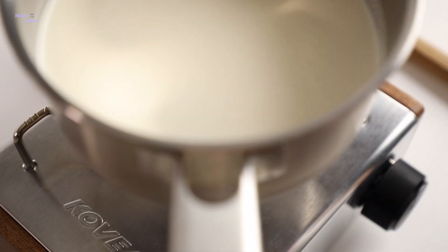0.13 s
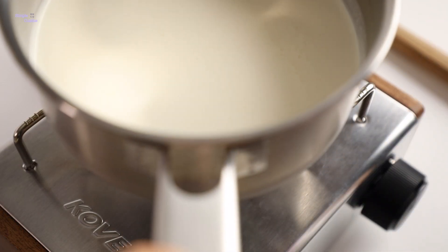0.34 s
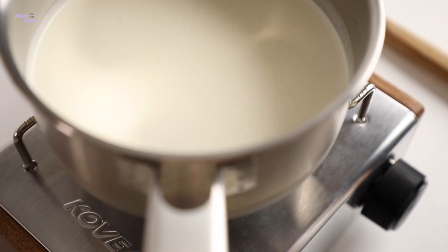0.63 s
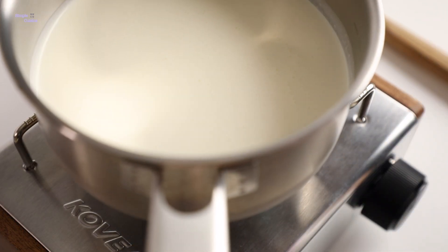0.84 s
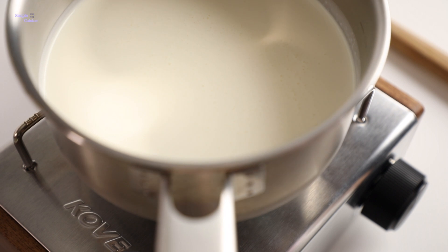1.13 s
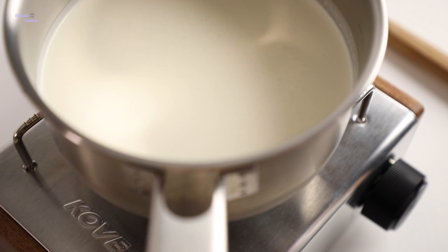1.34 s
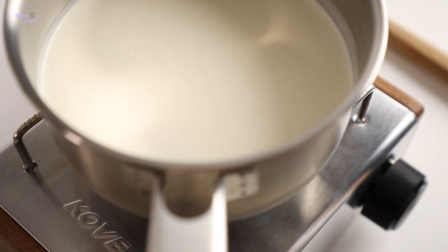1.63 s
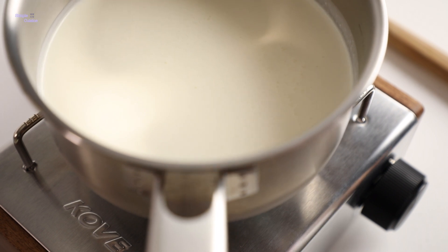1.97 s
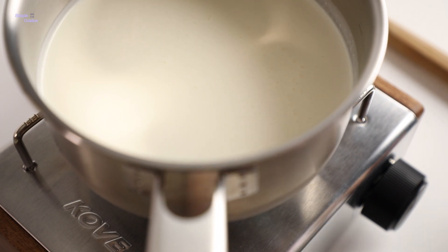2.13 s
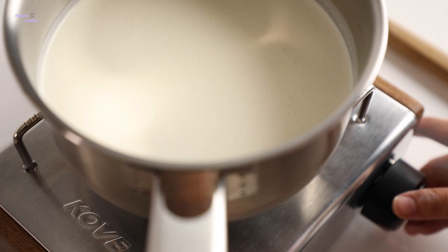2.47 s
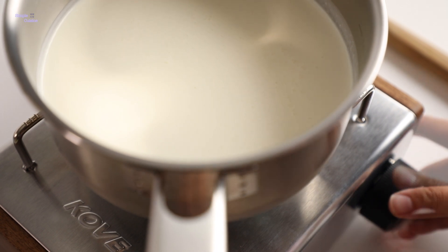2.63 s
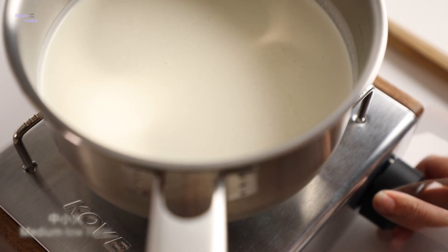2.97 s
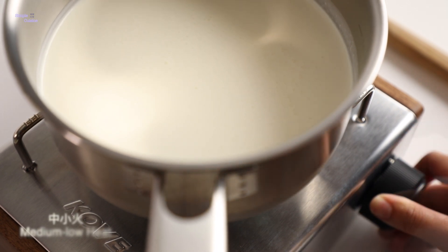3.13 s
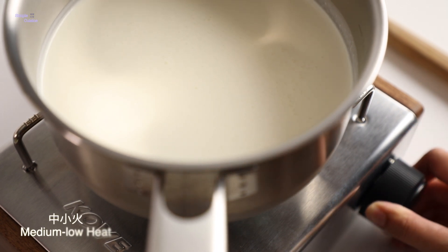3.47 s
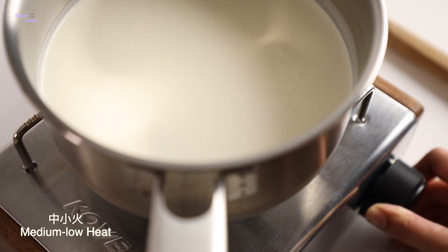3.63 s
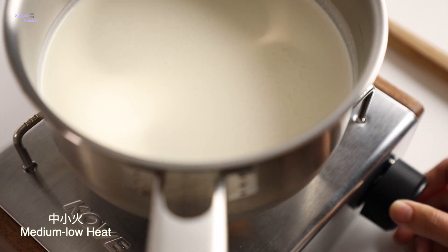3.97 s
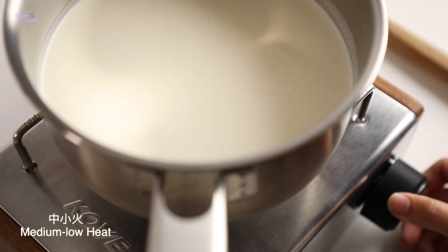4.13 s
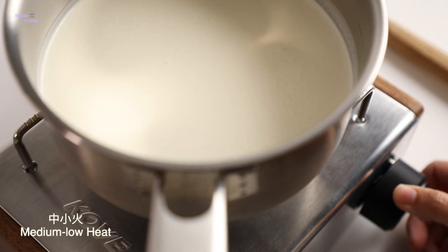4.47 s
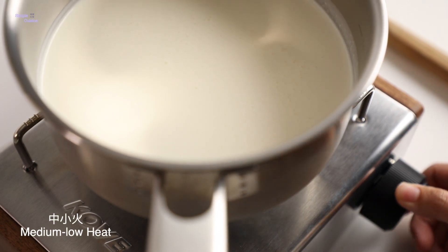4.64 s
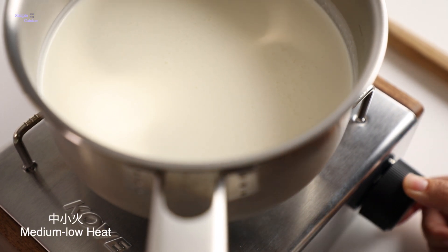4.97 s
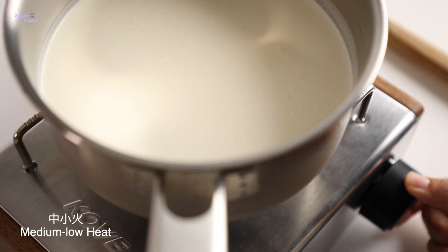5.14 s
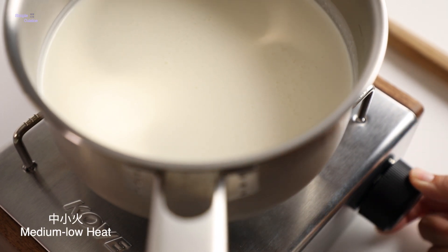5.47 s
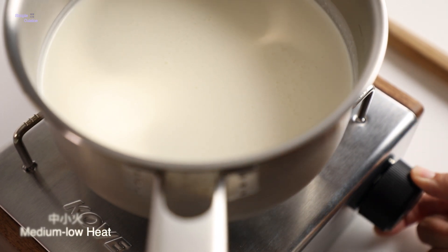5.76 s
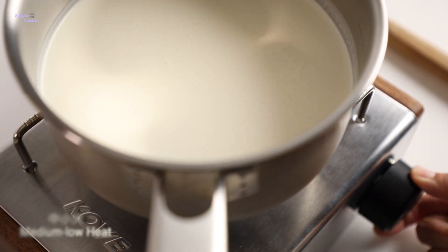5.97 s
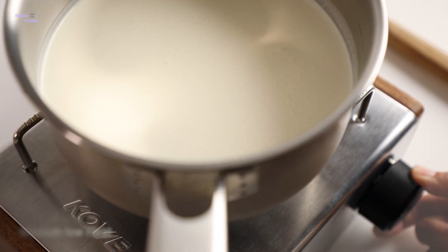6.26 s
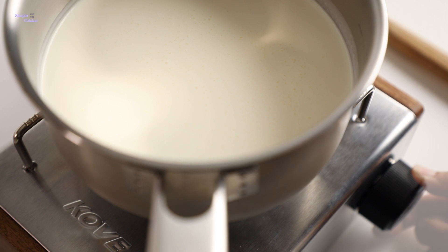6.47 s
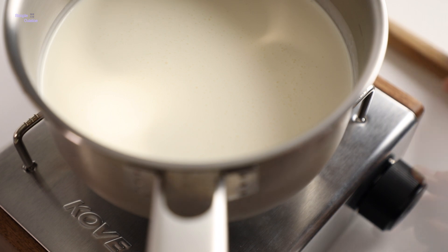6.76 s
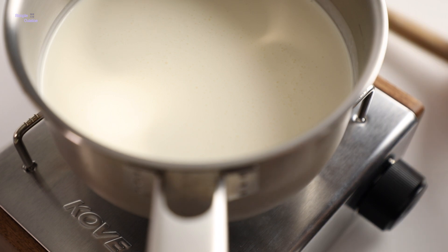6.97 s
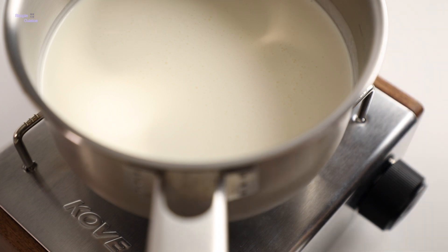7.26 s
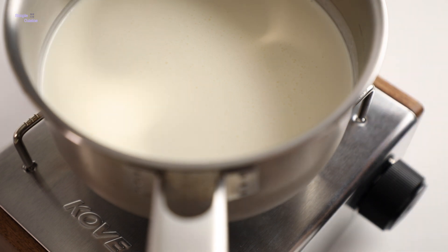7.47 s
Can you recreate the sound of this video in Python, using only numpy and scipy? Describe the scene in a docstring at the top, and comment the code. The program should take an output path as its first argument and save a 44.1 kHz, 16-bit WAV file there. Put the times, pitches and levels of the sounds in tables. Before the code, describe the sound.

A steel pan of milk clatters to rest on a portable stove, gas hisses, the igniter snaps loudly, and a soft flame burns before being turned down.

```python
"""A portable gas stove in a small kitchen, heard by one close microphone: gas hisses through the mixing
tube as a hand turns the knob, the piezo igniter snaps and the flame catches. Hiss and flame are shaped noise.
Before that a steel pan of milk rocks to rest on the support; its blows are noise bursts and ringing modes.
The knob springs back with a second click, then the flame is turned down to a soft hiss.
Taps and finger rubs are bands of noise; still kitchen air and a faint, distant hum lie underneath."""
import sys
import numpy as np
from scipy import signal
from scipy.fft import rfft, irfft, next_fast_len
from scipy.io import wavfile
from scipy.ndimage import map_coordinates

SR = 44100
rng = np.random.default_rng(int(sys.argv[2]) if len(sys.argv) > 2 else 0)


def file_out(sig):
    """Save sig as 16-bit WAV at sys.argv[1]."""
    # one column per channel
    cols = np.atleast_2d(sig).T
    # limit, then scale
    lim = np.clip(cols, -1, 1)
    pcm = np.round(lim * 32767).astype(np.int16)
    wavfile.write(sys.argv[1], SR, pcm)


N = 335368
T = np.arange(N) / SR  # time in s

# Kitchen air: frequency_hz, relative level_db
AIR_COLOUR = [(20, -23.5), (60, 0), (95, -5), (160, -7), (270, -4.5), (480, -0.5), (750, -5.5),
              (1100, -10.5), (1500, -6), (2100, -14), (3200, -16.5), (8500, -21.5), (12000, -29),
              (16000, -38.5)]
# Hum of a distant appliance: pitch_hz, level_db before HUM_GAIN_DB
HUM_TONES = [(161.5, -78), (236.9, -82.5), (1529, -88), (2412, -88), (3160, -89), (5006, -94.5)]
# Hard kitchen walls: frequency_hz, t60_s
WALL_DECAY = [(100, 0.22), (500, 0.74), (1500, .39), (5000, 0.39), (8000, 0.31), (14000, 0.23)]
# Taps on pan, knob and stove: start_s, level_db, pitch_hz, width_octaves, hold_s
TAPS = [(0.61, -61.5, 3030, 0.55, 0.0036), (2.347, -54.5, 4950, 1.8, .0005),
        (2.362, -52.5, 4900, 2.55, 0.013), (2.748, -50, 1770, 1.5, 0.022), (2.99, -51, 730, 2.26, 0.026),
        (3.84, -34, 1740, 2.3, 0.0042), (4.526, -30.5, 1280, 1.7, 0.006), (6.985, -58, 2200, 3, 0.00045),
        (7.002, -50.5, 1400, 5.8, 0.0018)]
# Fingers sliding on handle, knob and casing: start_s, length_s, level_db, centre_hz, width_octaves
FINGER_RUBS = [(1.764, 0.045, -70, 4800, .2), (1.826, 0.12, -65, 670, 0.52), (2.357, 0.26, -63, 6500, 1.15),
               (2.461, 0.098, -61.5, 5400, 1.06), (2.886, 0.083, -66, 1600, 2.3),
               (7.002, 0.062, -57, 1550, 4.8)]
# Pan rocking on its support: start_s, clatter_db, chatter_s, knock_db (dull), clank_db
PAN_BLOWS = [(0.8935, -15.5, 0.014, -15, -19.5), (1.027, -21.5, 0.015, -21, -16),
             (1.1385, -20.5, 0.024, -24.5, -16.5), (1.2342, -22, 0.0082, -25.5, -22.5),
             (1.403, -53.5, 0.028, -43.5, -42), (1.599, -67.5, .002, -54.5, -65)]
# Low and high modes of pan and support, damped by the milk: pitch_hz, relative level_db, t60_s
PAN_LOW_MODES = [(71.4, -19, 0.28), (92.3, -22.5, 0.2), (117, -20.5, 0.32), (374, -11, 0.32),
                 (423.4, -2, 0.13), (502, 3, 0.079), (587, -2, 0.13)]
PAN_HIGH_MODES = [(987, -4, 0.18), (1019, 5, 0.084), (1107, -6.5, 0.079), (1180, -11, 0.19),
                  (1470, -9, 0.18), (1750, -20, 0.3), (1907, -14, 0.14), (2355, -11, 0.16),
                  (4457, -16, 0.091), (5006, -15.5, .13)]
# Dense sheet modes of the pan: frequency_hz, relative level_db
PAN_SHEET = [(200, -27.5), (400, -2), (750, -8), (1100, 0.5), (1500, 1.5), (2000, -5.5), (2600, -0.5),
             (3400, -5), (4700, -3.5), (7000, -4), (10000, -10), (15000, -15.5)]
# Igniter hammer, its reset, the knob's stop: start_s, clatter_db, chatter_s, knock_db (dull), clank_db
IGNITER_BLOWS = [(3.6804, -2, 0.0075, -11, -20), (4.5166, -21.5, 0.0036, -40, -35),
                 (4.528, -41, 0.0071, -29, -46.5)]
# Low and high modes of the stove casing: pitch_hz, relative level_db, t60_s
CASE_LOW_MODES = [(127, -27, 0.73), (280, -21, 0.22), (384, -2.5, .11), (512, 2.5, 0.073)]
CASE_HIGH_MODES = [(1019, 2.5, 0.24), (1067, -0.5, 0.21), (1453, 2, 0.096), (1824, 2, 0.11),
                   (2980, -1, 0.08), (3400, -1.5, 0.17), (3710, 0, 0.065), (3730, -2, 0.12),
                   (4110, -2, 0.068), (4570, 0, .14), (5930, -3, 0.098), (6210, 2, 0.064),
                   (6500, -0.5, 0.078), (7800, 3, 0.045), (7870, 2, 0.05)]
# Dense sheet modes of the casing: frequency_hz, relative level_db
CASE_SHEET = [(60, -33.5), (220, -22), (400, -3.5), (780, -9.5), (1100, 1.5), (1800, 1), (2400, 0.5),
              (3500, 1), (6000, 2), (8500, 0), (11000, -6.5), (15000, -12)]
# Gas flow, set by the knob: time_s, flow_db (as hiss, before JET_GAIN_DB)
FLOW_CURVE = [(2.85, -65), (3.05, -57.5), (3.19, -55), (3.8, -54), (4.29, -54), (4.66, -53.5), (5.5, -54.5),
              (6.1, -56), (6.62, -66.5), (7.6, -62.5)]
# Hiss of the nozzle: frequency_hz, relative level_db
JET_HISS = [(200, -42), (450, -10.5), (1000, -19.5), (2500, -15), (3800, -12), (4700, -4), (5500, -9),
            (7100, 2), (8700, -12.5), (10000, -14), (11000, -14.5), (12000, -24.5), (14500, -23.5),
            (16000, -32)]
# Resonances of the mixing tube: centre_hz, width_hz (6 dB down), relative level_db
TUBE_RESONANCES = [(476, 79, -0.5), (3166, 180, -3.5), (4603, 280, -6), (6620, 40, 4.5), (6940, 31, 12.5),
                   (7030, 52, 10), (7150, 81, 3), (7480, 83, 1.5), (7740, 200, -0.5), (9130, 770, -8.5)]
# Deep rumble of the fire: frequency_hz, relative level_db
RUMBLE_COLOUR = [(30, -26), (85, -9), (150, 2.5), (200, -3.5), (300, -10.5), (600, -31.5), (2000, -71)]
# Roar of the fire: frequency_hz, relative level_db
ROAR_COLOUR = [(40, -55), (100, -27.5), (200, -18), (280, -1), (370, -0.5), (470, -0.5), (540, -16.5),
               (620, -21), (800, -24), (1000, -41), (3000, -51.5)]
# Flame tips on the pan: frequency_hz, relative level_db
TIPS_COLOUR = [(600, -17), (1000, -8), (1200, 2.5), (1700, -1), (2100, -6), (3000, -20), (6000, -36.5)]

AIR_DB, HUM_GAIN_DB = -66.0, 2.5
CLICK_DB, CLICK_HOLD_S, CLICK_T60_S = -5.5, 0.0012, 0.016  # bright contact; level relative to the tap
CLICK_PITCH_RATIO = 1.94  # centre of the click over the tap's pitch
TAP_T60_S = 0.052
GRAIN_DB, GRAINS_PER_S = 2, 240  # skin sticks and slips as it slides
CRACK_DB = 2.5  # relative to the clatter
DB_PER_OCTAVE = 22  # a blow this much softer is an octave duller
THUMP_DB, THUMP_LAG_S, THUMP_HOLD_S, THUMP_T60_S = -24, 0.0027, 0.006, 0.048
VALVE_S, VALVE_RISE_S, JET_GAIN_DB = 2.78, 0.069, 2.5  # the valve opens
LIT_S, SPREAD_S = 3.72, 0.24  # the gas catches and the fire runs round the burner
ROAR_DB, USUAL_FLOW_DB = -54.5, -55  # warm burner at the usual flow, before BURNER_GAIN_DB
ROAR_PER_FLOW = 1.6  # dB of roar per dB of flow
SURGE_DB, SETTLE_S = 13, 1.6  # the fresh flame is louder and calms as the burner warms (time constant)
BURNER_GAIN_DB = -1.5
TOP_HZ = 15800  # edge of the final low-pass


def amp(db):
    """Decibels to gain."""
    return 10 ** (np.asarray(db) / 20)


def unit(x):
    """Scale to rms 1."""
    return x / np.sqrt(np.mean(x ** 2) + 1e-20)


def along(points, hz):
    """Values of a frequency table, joined on a log axis."""
    f, v = np.transpose(points)
    return np.interp(np.log(hz + 1), np.log(f + 1), v)


def wobble(rate):
    """A smooth random curve, rate knots a second."""
    knots = rng.standard_normal(int(N * rate / SR) + 4)
    return map_coordinates(knots, [T * rate])


def noise(gain, size=N):
    """Noise of rms 1 whose spectrum follows gain(Hz)."""
    m = next_fast_len(size)
    spectrum = rfft(rng.standard_normal(m)) * gain(np.fft.rfftfreq(m, 1 / SR))
    return unit(irfft(spectrum, m)[:size])


def coloured(points):
    """Noise of rms 1 with the colour of a level table."""
    return noise(lambda hz: amp(along(points, hz)))


def below(hz, edge_hz, order=4):
    """Gain of a low-pass slope; with the arguments swapped, of a high-pass one."""
    return 1 / np.sqrt(1 + (hz / edge_hz) ** (2 * order))


def band(centre_hz, octaves):
    """One second of noise in a band, equally strong in each octave of it."""
    low_hz = centre_hz / 2 ** (octaves / 2)
    high_hz = centre_hz * 2 ** (octaves / 2)

    def gain(hz):
        """Band edges on a slope of equal power per octave."""
        return below(hz, high_hz, order=9) * below(low_hz, hz + 1, order=9) / np.sqrt(hz + 1)

    return noise(gain, size=SR)


def burst(hold, t60):
    """Envelope of a contact: it holds for a moment, then dies away."""
    return amp(-60 * np.maximum(T[:SR] - hold, 0) / t60)


def add(track, s, sound):
    """Mix a sound in at time s."""
    part = track[round(s * SR):][:len(sound)]
    part += sound[:len(part)]


def ring(modes, rise, scatter_db, detune):
    """Decaying modes; the point of contact shifts their strength and pitch a little."""
    hz, db, t60 = np.transpose(modes)[:, :, None]
    t = T[:SR]
    level = amp(db + scatter_db * rng.standard_normal(hz.shape) - 60 * t / t60)
    hz = hz * (1 + detune * rng.standard_normal(hz.shape))
    cycles = hz * t + rng.random(hz.shape)
    onset = 1 - np.exp(-t / rise)
    return (level * np.sin(2 * np.pi * cycles)).sum(0) * onset


def kitchen(x, wet_db, delay=0.0032):
    """A sound and its answer from the hard walls, a noise tail with its own decay at each frequency."""
    hz, t, z = signal.stft(rng.standard_normal(SR // 2), SR, nperseg=256)
    decay = amp(-60 * t / along(WALL_DECAY, hz)[:, None])
    tail = signal.istft(z * decay, SR, nperseg=256)[1]
    tail *= 1 - np.exp(-(T[:len(tail)] / delay) ** 2)  # the walls answer a little late
    tail /= np.linalg.norm(tail)
    return x + amp(wet_db) * signal.fftconvolve(x, tail)[:len(x)]


def background():
    """Still kitchen air as shaped noise, with faint hum tones that drift in phase."""
    hum = sum(amp(db + HUM_GAIN_DB) * np.sin(2 * np.pi * hz * T + 0.7 * wobble(1.6)) for hz, db in HUM_TONES)
    return hum + amp(AIR_DB) * coloured(AIR_COLOUR)


def handling():
    """Taps, each a click and a short ring, and the grainy brush of fingers."""
    out = np.zeros(N)
    for s, db, hz, octaves, hold in TAPS:
        click = band(CLICK_PITCH_RATIO * hz, octaves=3.2) * burst(CLICK_HOLD_S, CLICK_T60_S)
        body = band(hz, octaves) * burst(hold, TAP_T60_S)
        add(out, s, kitchen(amp(db) * (amp(CLICK_DB) * click + body), wet_db=-11))
    for s, length, db, hz, octaves in FINGER_RUBS:
        stroke = np.sqrt(np.abs(np.sin(np.pi * np.minimum(T[:SR] / length, 1))))
        grain = unit(amp(GRAIN_DB * wobble(GRAINS_PER_S)[:SR]))
        add(out, s, kitchen(amp(db) * band(hz, octaves) * stroke * grain, wet_db=-4.0))
    return out


def blows(rows, low_modes, high_modes, sheet, t60, wet_db, rise, detune, hard_edge_hz):
    """Metal on metal: a bright crack, a crash of dense sheet modes, a few strong modes. Harder is brighter."""
    out = np.zeros(N)
    for s, db, chatter, knock_db, clank_db in rows:
        edge_hz = hard_edge_hz * 2 ** (db / DB_PER_OCTAVE)  # hard_edge_hz: treble edge of a 0 dB blow

        def colour(hz):
            """The sheet's spectrum, dulled for a soft blow."""
            return amp(along(sheet, hz)) * below(hz, edge_hz)

        bright = noise(lambda hz: colour(hz) * below(4500, hz + 1), size=SR)  # above 4500 Hz
        crack = amp(db + CRACK_DB) * bright * burst(chatter / 2, 0.019)
        crash = amp(db) * noise(colour, size=SR) * burst(chatter, t60)
        knock = amp(knock_db) * ring(low_modes, rise, scatter_db=0.2, detune=detune)
        # higher modes speak sooner
        clank = amp(clank_db) * ring(high_modes, rise / 2, scatter_db=2.5, detune=detune)
        add(out, s, crack + kitchen(crash, wet_db) + kitchen(knock + clank, wet_db=-18.5))
    return out


def pan():
    """The steel pan strikes its support as it rocks to rest; the milk damps its modes."""
    return blows(PAN_BLOWS, PAN_LOW_MODES, PAN_HIGH_MODES, PAN_SHEET, t60=0.06, wet_db=-13.5,
                 rise=0.0044, detune=0.011, hard_edge_hz=13850)


def thump():
    """The igniter's first blow shakes the stove on the table: a short band of low noise."""
    out = np.zeros(N)
    jolt = amp(THUMP_DB) * band(centre_hz=66, octaves=2.3) * burst(THUMP_HOLD_S, THUMP_T60_S)
    add(out, IGNITER_BLOWS[0][0] + THUMP_LAG_S, kitchen(jolt, wet_db=-14.0))
    return out


def igniter():
    """Hammer, reset and knob stop each strike the thin stove casing and set its modes ringing."""
    return blows(IGNITER_BLOWS, CASE_LOW_MODES, CASE_HIGH_MODES, CASE_SHEET, t60=0.049, wet_db=-10,
                 rise=0.0013, detune=0.0014, hard_edge_hz=15500)


def gas_flow():
    """The flow in dB at each sample; it drives both hiss and flame."""
    return np.interp(T, *np.transpose(FLOW_CURVE))


def tube_power(hz):
    """Summed power of the mixing tube's narrow resonances."""
    return sum(amp(db) ** 2 / (1 + (2 * (hz - centre) / width) ** 2) ** 2
               for centre, width, db in TUBE_RESONANCES)


def jet():
    """Gas leaves the nozzle and excites the narrow resonances of the mixing tube."""
    hiss = noise(lambda hz: np.sqrt(amp(along(JET_HISS, hz)) ** 2 + tube_power(hz)))
    opened = np.clip((T - VALVE_S) / VALVE_RISE_S, 0, 1)
    return opened * amp(gas_flow() + JET_GAIN_DB + 0.3 * wobble(24)) * hiss


def flame():
    """The fire runs round the burner. Turned down, its tips fade first, then the roar, last the rumble."""
    surge_db = SURGE_DB * np.exp(-np.maximum(T - LIT_S, 0) / SETTLE_S)
    roar_db = ROAR_DB + ROAR_PER_FLOW * (gas_flow() - USUAL_FLOW_DB) + surge_db
    caught = np.clip((T - LIT_S) / SPREAD_S, 0, 1)
    flutter = wobble(25)  # shared by roar and tips
    rumble = amp(0.68 * roar_db - 25.5 + 0.8 * wobble(12)) * coloured(RUMBLE_COLOUR)
    roar = amp(roar_db + 1.3 * flutter) * coloured(ROAR_COLOUR)
    tips = amp(1.304 * roar_db + 1.08 * flutter) * coloured(TIPS_COLOUR)
    return caught * (rumble + roar + tips)


def burner():
    """Gas jet and flame in the room; the walls comb the steady hiss."""
    return amp(BURNER_GAIN_DB) * (kitchen(jet(), wet_db=-7.5) + kitchen(flame(), wet_db=-9.5))


def scene():
    """Kitchen air, hands, pan, igniter and burner at one close microphone."""
    return (background() + handling() + pan() + thump() + igniter() + burner())[None]


def record(dry):
    """Peaks beyond full scale are clipped, then a steep low-pass removes everything above TOP_HZ."""
    clipped = np.clip(dry, -1, 1)
    m = next_fast_len(N + SR // 2)
    limit = below(np.fft.rfftfreq(m, 1 / SR), TOP_HZ, order=60)
    return irfft(rfft(clipped, m) * limit, m)[..., :N]


dry = scene()
out = record(dry)
file_out(out)
```